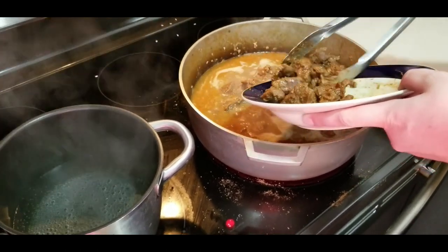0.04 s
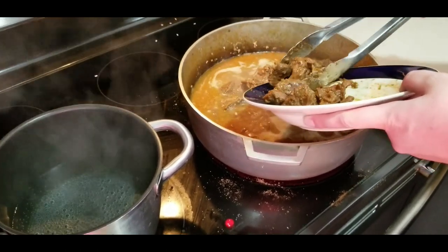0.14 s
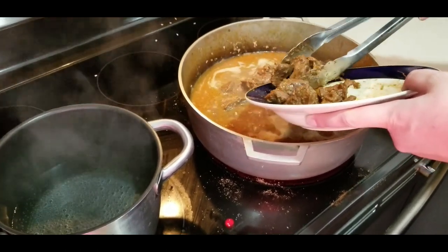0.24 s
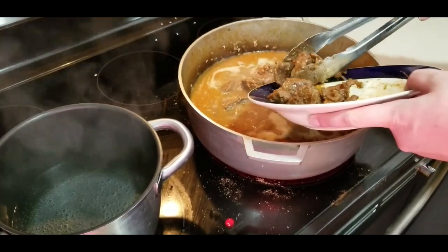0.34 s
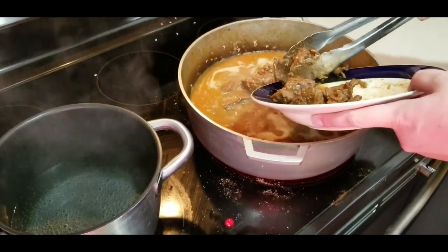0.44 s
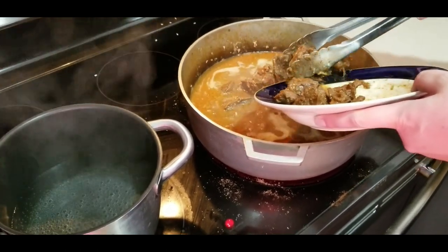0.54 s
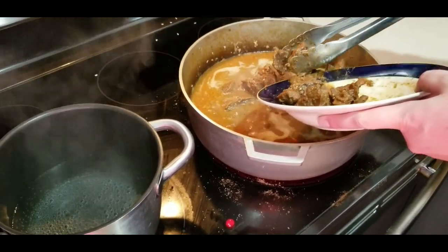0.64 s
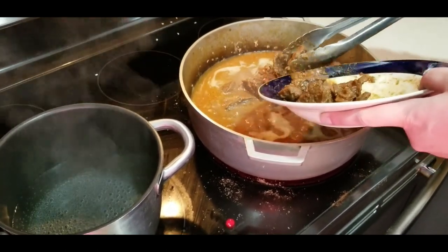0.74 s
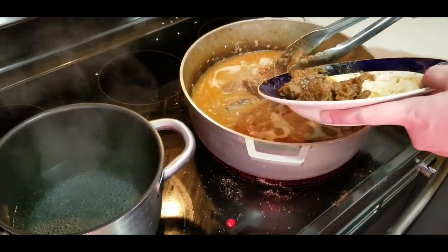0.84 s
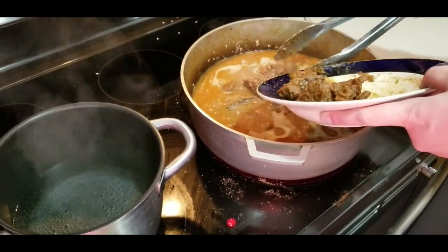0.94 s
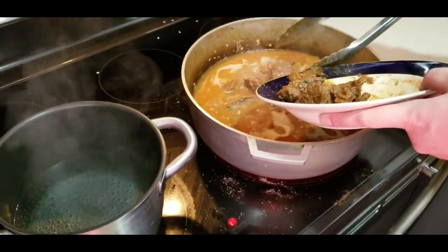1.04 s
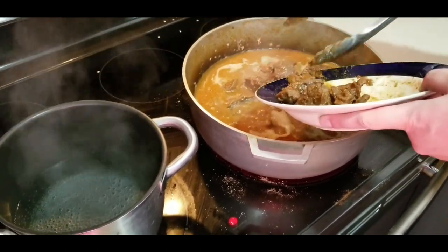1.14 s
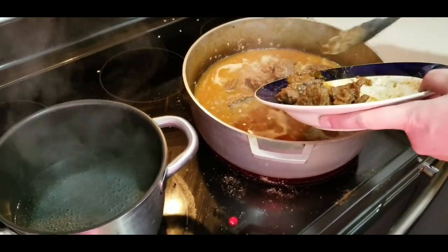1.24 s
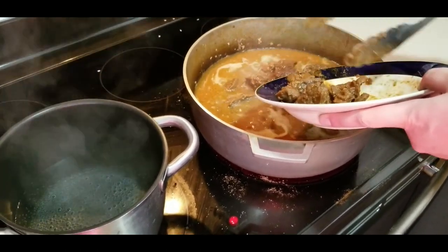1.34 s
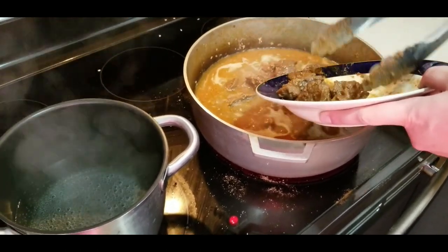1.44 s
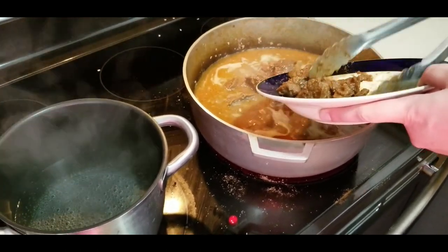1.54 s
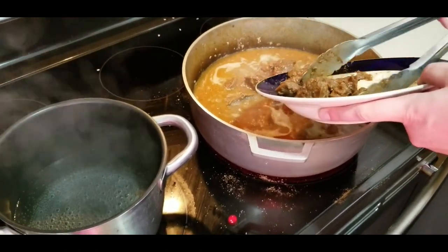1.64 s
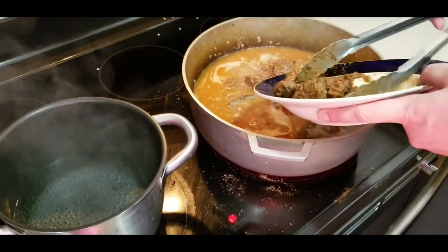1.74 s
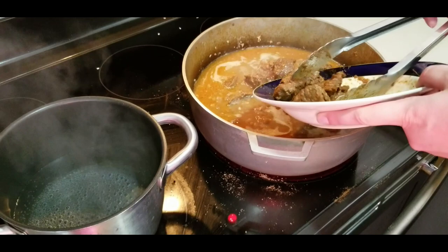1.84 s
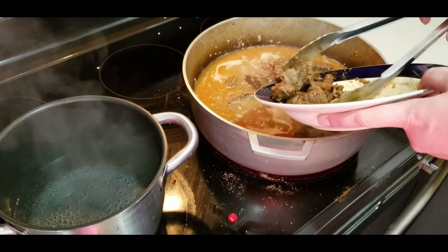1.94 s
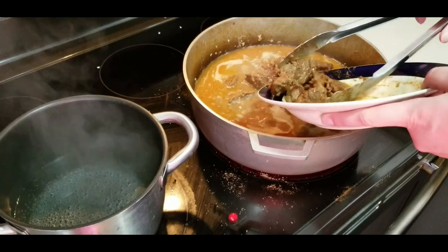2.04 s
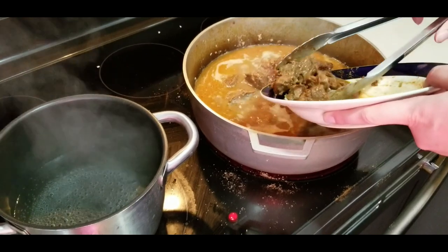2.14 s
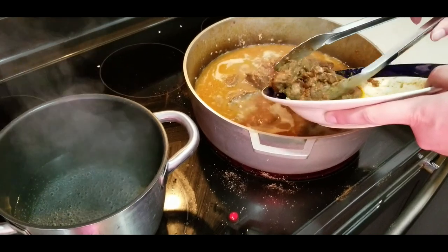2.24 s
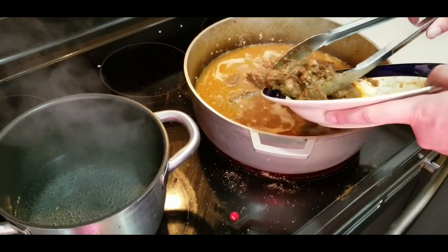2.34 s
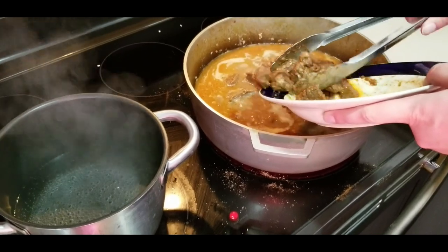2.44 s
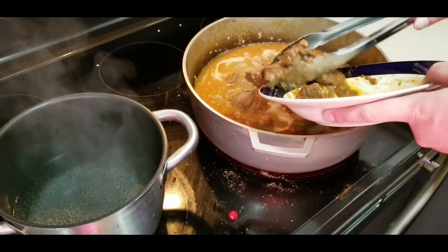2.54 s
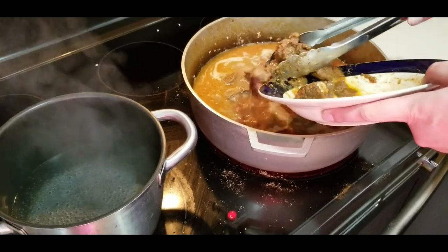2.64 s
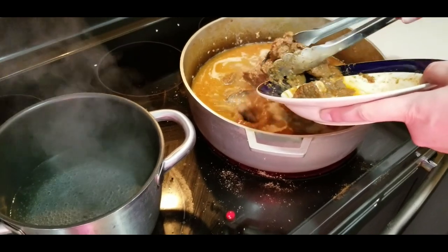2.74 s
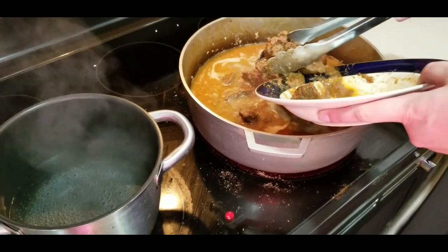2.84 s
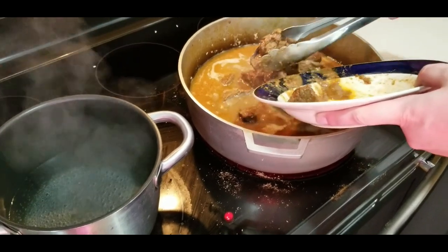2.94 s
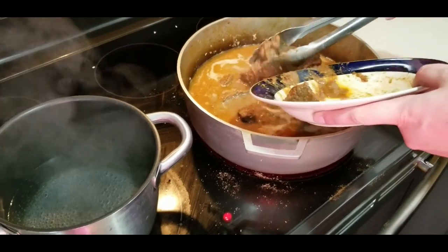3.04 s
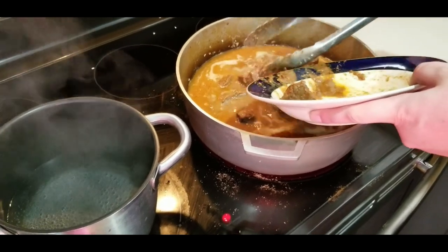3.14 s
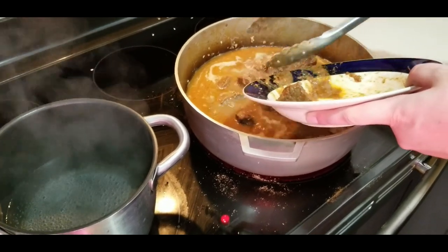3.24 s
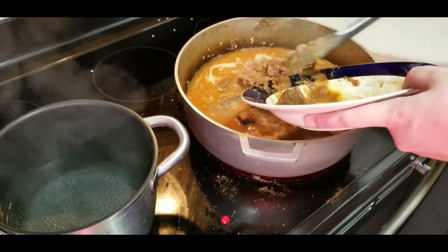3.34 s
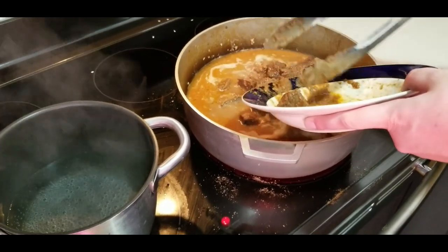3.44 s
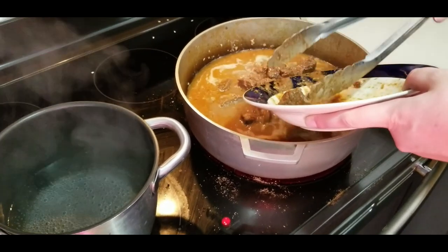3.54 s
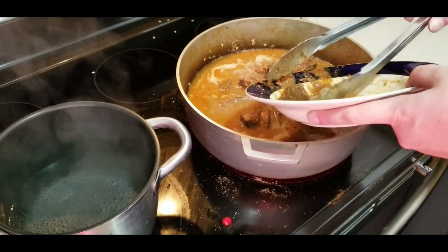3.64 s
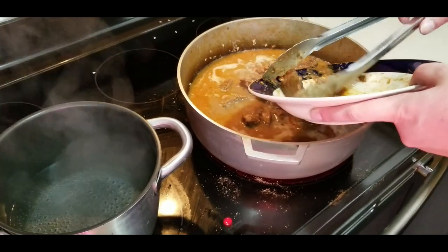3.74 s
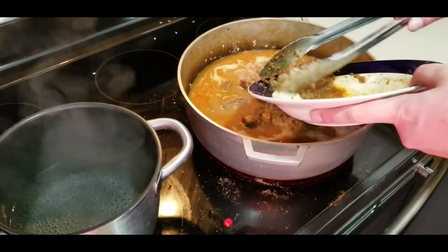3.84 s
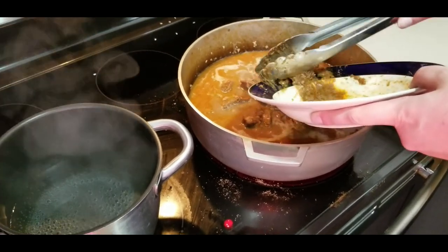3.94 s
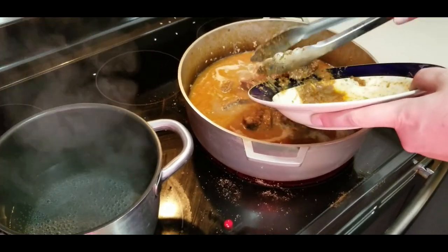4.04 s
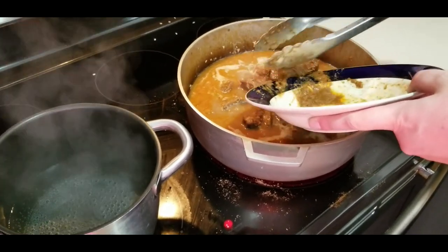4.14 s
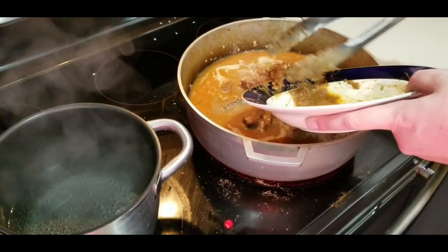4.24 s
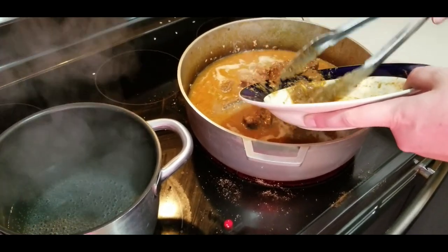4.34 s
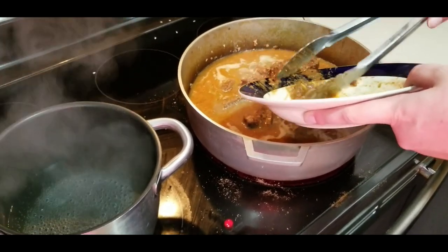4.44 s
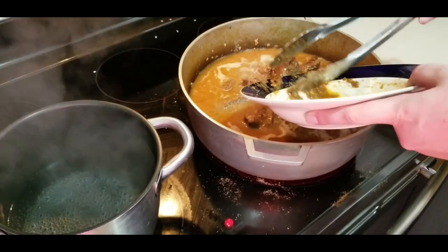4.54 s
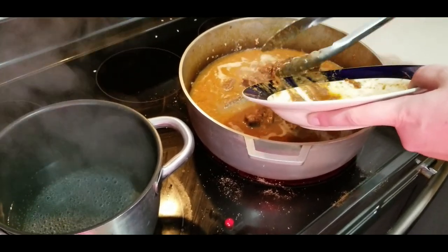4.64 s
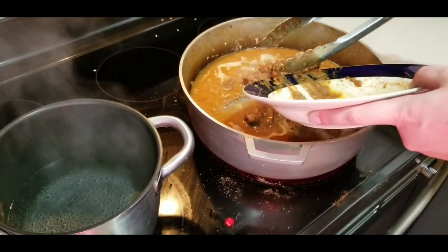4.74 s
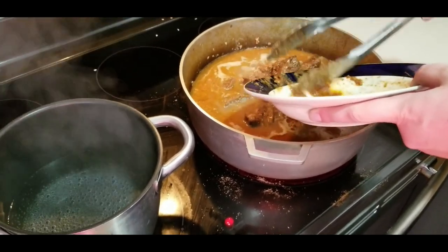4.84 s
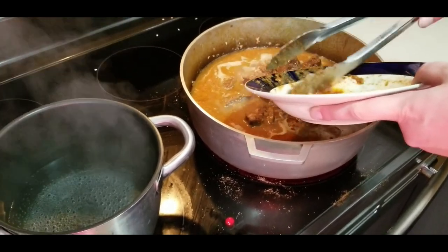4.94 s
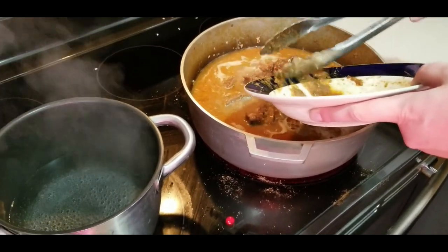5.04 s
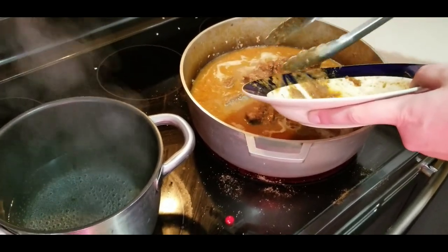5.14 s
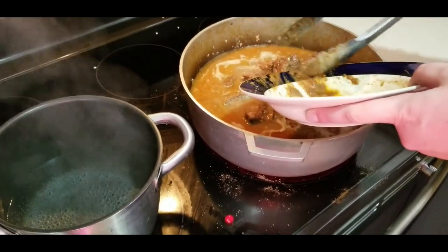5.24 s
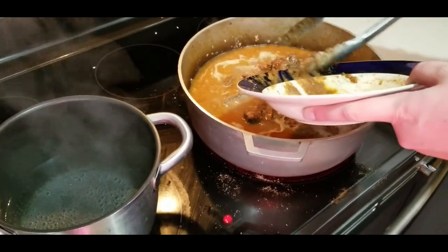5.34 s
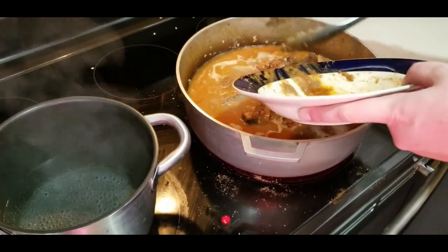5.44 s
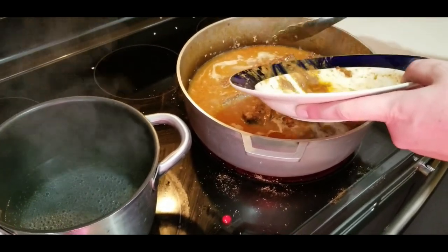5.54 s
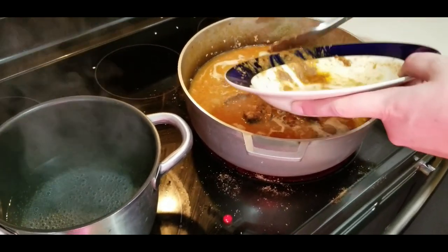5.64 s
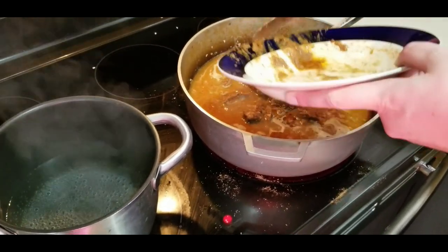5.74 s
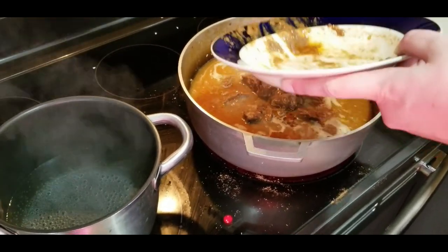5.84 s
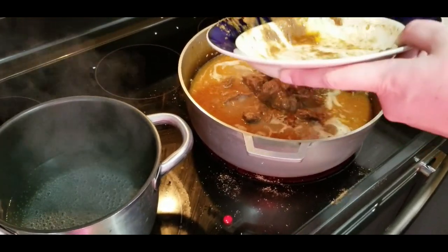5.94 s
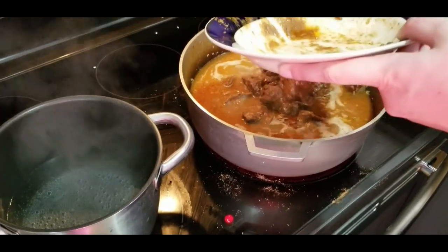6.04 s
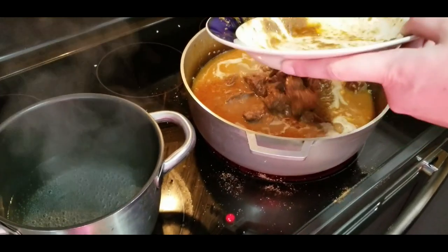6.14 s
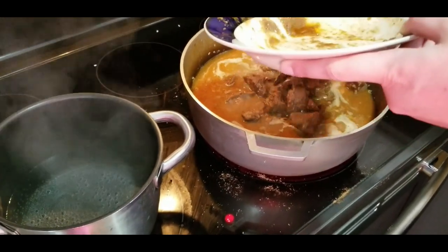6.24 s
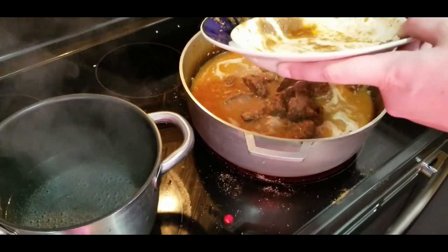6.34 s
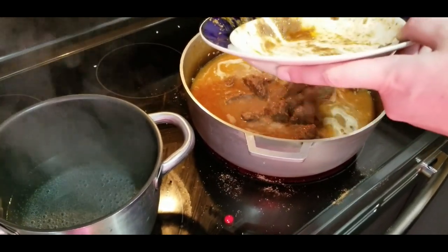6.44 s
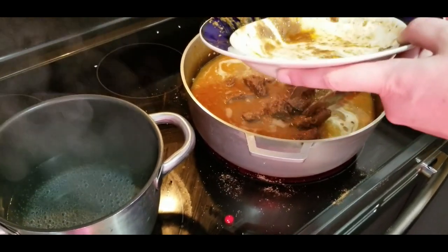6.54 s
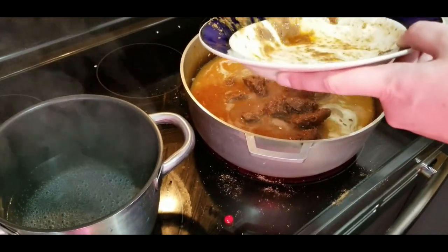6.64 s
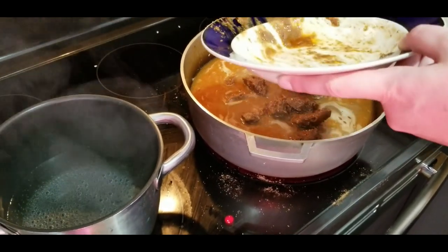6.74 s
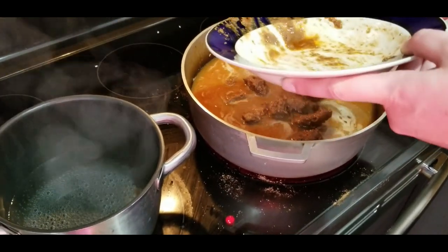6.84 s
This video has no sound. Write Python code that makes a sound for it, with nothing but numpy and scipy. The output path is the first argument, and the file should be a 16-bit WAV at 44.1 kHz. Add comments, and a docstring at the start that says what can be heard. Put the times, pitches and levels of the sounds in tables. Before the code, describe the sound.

A phone about half a metre from the stove picks up quiet simmering, plopping bubbles, airy steam and a wavering low drone. After a moment and a half, tongs knock sharply on a hand-held plate, ringing glassy and choked, with steel rattle and short gritty drags. The busiest strikes come in the second half, then stop; the kitchen bed drops and partly swells back, with a few faint spits and ticks.

```python
"""A kitchen heard from half a metre by a phone: from the first moment pots bubble and steam hisses over
stove rumble, mains hum and a wavering drone; steel tongs tick on their own, bubbles burst and sauce spits.
From 1.5 s the tongs strike and scrape a hand-held ceramic plate: each blow rings its modes and rattles the steel.
Late on the kitchen sinks in level, then partly returns. Damped tones make bubbles and plate, shaped noise the rest."""
import sys
import numpy as np
from scipy import signal
from scipy.fft import rfft, irfft
from scipy.io import wavfile
from scipy.ndimage import uniform_filter1d

SR = 44100
rng = np.random.default_rng(int(sys.argv[2]) if len(sys.argv) > 2 else 0)


def bounce(signal):
    """Save signal as a 16-bit WAV file at the path given by the first command-line argument."""
    frames = np.transpose(np.atleast_2d(signal))
    limited = np.clip(frames, -1, 1)
    pcm = np.round(limited * 32767).astype(np.int16)
    wavfile.write(sys.argv[1], SR, pcm)


N = 304025


def undb(db):
    """Decibels to amplitude."""
    return 10 ** (np.asarray(db) / 20)


def unit(x):
    """Scale to rms 1."""
    return x / np.sqrt(np.mean(x ** 2) + 1e-30)


def band(x, lo, hi):
    """Steep band-pass."""
    return signal.sosfilt(signal.butter(3, [lo, min(hi, SR / 2.2)], "band", fs=SR, output="sos"), x)


def fade(t, t60):
    """Exponential decay that falls 60 dB in t60."""
    return np.exp(-np.log(1000) * t / t60)


def curve(table):
    """Columns of a timed table at every sample."""
    s, *columns = np.transpose(table)
    return [np.interp(np.arange(N) / SR, s, c) for c in columns]


def pair(count, alike):
    """Left and right noise that share a part."""
    mid, side = rng.standard_normal((2, count))
    alike = np.clip(alike, 0, 1)
    opposite = np.array([[1], [-1]])
    return np.sqrt((1 + alike) / 2) * mid + np.sqrt((1 - alike) / 2) * side * opposite


def coloured(x, points):
    """Noise shaped by (f/Hz, level/dB) points, joined along log frequency."""
    hz, db = np.transpose(points)
    bins = np.maximum(np.arange(N // 2 + 1) * SR / N, 1)
    return irfft(rfft(x) * undb(np.interp(np.log(bins), np.log(hz), db)), N)


def walk(rate):
    """Slow chance, spread 1, smoothed twice over 1/rate seconds."""
    k = int(SR / rate)
    smooth = uniform_filter1d(rng.standard_normal(N), k)
    return unit(uniform_filter1d(smooth, k))


def add(out, s, sound, pan_db=0):
    """Mix a sound in at time s, left minus right by pan_db."""
    i = int(s * SR)
    gains = undb(np.array([[pan_db], [-pan_db]]) / 2)
    out[:, i:i + sound.shape[-1]] += (sound * gains)[:, :N - i]


def bubble(hz, cycles, glide):
    """A burst cavity: a damped tone that rises as it closes."""
    n = np.arange(int(3 * cycles * SR / hz)) * hz / SR  # time in cycles
    tone = np.sin(2 * np.pi * n * (1 + glide * n / cycles))
    return tone * np.exp(-2 * n / cycles) * np.minimum(n, 1)


def simmer(count=900, centre_hz=620, spread=0.1737, cycles=9, glide=0.044, size_db=0.0, pan_db=3):
    """A crowd of small bubbles in the pots, at chance times, pitches and sides."""
    out = np.zeros((2, N))
    for when, pitch, size, side in zip(rng.random(count), *rng.standard_normal((3, count))):
        sound = undb(size_db * size) * bubble(centre_hz * np.exp(spread * pitch), cycles, glide)
        add(out, when * (N - 1) / SR, sound, pan_db * side)
    return unit(out)


# colour of the hiss: f/Hz, level/dB per Hz
HISS_COLOUR = [(590, -34.5), (1000, 0), (1200, -9.5), (1470, -9.5), (2280, -19), (3120, -15.5), (6550, -15),
               (7530, -17.5), (8260, -23.5), (15100, -23.5), (16000, -37)]
# steam rises mostly to the right of the phone: f/Hz, left minus right/dB
HISS_PAN = [(1000, -3.5), (2400, -1), (4400, -11), (8100, -4.5), (15000, 2.5)]


def steam():
    """Smooth, slowly wavering hiss of steam, nearly unrelated in the two channels."""
    left, right = coloured(pair(N, 0.057), HISS_COLOUR)
    left = coloured(left, np.multiply(HISS_PAN, [1, .5]))
    right = coloured(right, np.multiply(HISS_PAN, [1, -.5]))
    return unit(np.array([left, right])) * undb(.6 * walk(5))


def spit(hz, cycles, grit):
    """A wet click: a bubble roughened by a breath of noise around its pitch."""
    tone = bubble(hz, cycles, glide=0.03)
    n = np.arange(len(tone))
    noise = unit(band(rng.standard_normal(len(tone)), hz / 1.57, hz * 1.26))
    onset = np.minimum(n * hz / SR / 2, 1)  # two cycles
    return tone + grit * noise * fade(n / len(tone), 2.2) * onset


def spatter(count=160, centre_hz=1100, spread=0.167, size_db=-0.5, pan_db=3):
    """A scatter of faint spits of sauce, at chance times, sizes, pitches and sides."""
    out = np.zeros((2, N))
    sizes = rng.exponential(size=count)
    for when, size, pitch, side in zip(rng.random(count), sizes, *rng.standard_normal((2, count))):
        sound = undb(size_db * size) * spit(centre_hz * np.exp(spread * pitch), cycles=5.3, grit=0.4)
        add(out, when * (N - 1) / SR, sound, pan_db * side)
    return unit(out)


# common level of all kitchen layers: t/s, level/dB
KITCHEN_LEVEL = [(0, -45), (.6, -44), (1.3, -44.5), (3.5, -44), (4.25, -45.5), (4.7, -47.5), (5.2, -46),
                 (5.5, -52), (6.0, -52), (6.89, -47)]
# colour of stove and pots: f/Hz, level/dB per Hz
RUMBLE_COLOUR = [(36, -45), (62, -10.5), (112, -8.5), (146, -3.5), (178, -7.5), (237, -4), (271, -13),
                 (356, -2.5), (388, -21.5), (492, -7.5), (599, -4.5), (713, -16.5), (778, -8), (1110, -32),
                 (1200, -28), (1560, -44), (2640, -120)]
# side the rumble comes from: f/Hz, left minus right/dB
RUMBLE_PAN = [(40, -0.5), (80, -1.5), (160, 0.7), (240, -2), (400, -9.5)]
MAINS_HZ, MAINS_DB = 47.7, -7.5
DRONE_HZ, DRONE_WIDTH_HZ, DRONE_DB = 149.4, 9.7, -3
RUMBLE_DB, STEAM_DB, SPATTER_DB = -3.5, -7.5, -18  # against the kitchen level


def kitchen(bubble_db=-3, swell_db=2.0):
    """Rumble of stove and pots, mains hum, a wavering narrow-band drone, bubbles, spits and steam."""
    kitchen_db, = curve(KITCHEN_LEVEL)
    low = coloured(pair(N, 0.92), RUMBLE_COLOUR)
    low = signal.sosfilt(signal.butter(4, 430, fs=SR, output="sos"), low)
    low = np.array([coloured(ear, np.multiply(RUMBLE_PAN, [1, half])) for ear, half in zip(low, (.5, -.5))])
    mains = np.sin(2 * np.pi * MAINS_HZ * np.arange(N) / SR)
    mains = undb(MAINS_DB + np.array([[-.7], [.7]])) * mains
    drone = band(rng.standard_normal(N), DRONE_HZ - DRONE_WIDTH_HZ / 2, DRONE_HZ + DRONE_WIDTH_HZ / 2)
    rumble = undb(0.5) * unit(low) + mains + undb(DRONE_DB) * unit(drone)
    seethe = unit(band(coloured(pair(N, 0.45), RUMBLE_COLOUR), 405, 1230))
    boil = undb(-2.5) * seethe * undb(swell_db * walk(2.25)) + undb(bubble_db) * simmer()
    air = undb(STEAM_DB) * steam() + undb(SPATTER_DB) * spatter()
    return undb(kitchen_db) * (undb(RUMBLE_DB) * rumble + boil + air)


# the tongs' own ticks and clacks: t/s, level/dB, brightness/dB from band to band, t60/s
TICKS = [(0.0116, -61.5, 2, 0.24), (0.208, -60.5, -5, 0.071), (0.2483, -64, -3, 0.23),
         (0.2777, -61.5, 1, 0.15), (0.324, -66.5, -10, 0.15), (0.587, -71, 11, 0.19),
         (0.6678, -56.5, 10.5, 0.17), (0.7217, -60, 2, 0.18), (0.7813, -66, 7, 0.14),
         (0.8074, -68, 9, 0.33), (0.906, -53.5, 5.5, 0.18), (2.5572, -34, 6, 0.042),
         (2.6867, -40, -0.5, 0.12), (2.9224, -54, 5, 0.29), (2.996, -50.5, 3.5, 0.17),
         (3.0313, -49.5, -1, 0.062), (3.0632, -55, 3, 0.42), (3.229, -52.5, -4, 0.41),
         (4.035, -61, -5, 0.12), (4.7006, -58.5, -0.5, 0.17), (6.0194, -67.5, 1, 0.12),
         (6.217, -66.5, -1, 0.12), (6.45, -69.5, 14, 0.23)]
# bands of a tick: low f/Hz, high f/Hz
TICK_BANDS = [(2500, 5000), (5000, 8000), (8000, 16000)]
# balance of those bands: level/dB
TICK_BANDS_DB = [0, 1, -1.5]
TICK_PAN_DB = -3.5


def ticks(out, alike=0.19, crack_db=5, crack_t60=0.032):
    """Thin steel clicks: a sharp crack and a short unpitched rattle."""
    t = np.arange(int(.3 * SR)) / SR
    for s, level_db, bright_db, t60 in TICKS:
        band_db = np.add(TICK_BANDS_DB, bright_db * np.array([-1, 0, 1]))
        rattle = 0
        for edges, db in zip(TICK_BANDS, band_db):
            rattle = rattle + undb(db) * unit(band(pair(len(t), alike), *edges))
        decay = fade(t, t60) + undb(crack_db) * fade(t, crack_t60)
        add(out, s, undb(level_db) * rattle * decay, TICK_PAN_DB)


# big bubbles bursting in the pots: t/s, level/dB, f/Hz
POPS = [(0.022, -34, 640), (0.083, -30.5, 495), (0.222, -31, 530), (0.346, -31, 506), (0.577, -28, 600),
        (0.861, -30.5, 588), (1.054, -29.5, 493), (1.123, -29, 616), (2.02, -29.5, 610), (2.083, -31, 530),
        (2.164, -30.5, 614), (3.429, -36, 650), (4.088, -32, 584), (4.266, -30, 623), (4.317, -31.5, 555),
        (5.093, -36, 610), (5.216, -33, 750), (6.103, -36, 944), (6.219, -35, 533), (6.423, -38, 596)]


def pops(out, pan_db=-3.0):
    """Single bubbles that stand out: damped tones with a slight rise."""
    for s, level_db, hz in POPS:
        add(out, s, undb(level_db) * bubble(hz, cycles=8.8, glide=0.023), pan_db)


# sauce spitting, short and higher: t/s, level/dB, f/Hz
SPITS = [(0.2485, -42, 1740), (0.387, -35.5, 1130), (0.599, -39, 1120), (0.8091, -37, 1610),
         (0.9564, -38, 1570), (1.071, -40.5, 1360), (1.266, -33, 1100), (1.3565, -36.5, 1150),
         (1.8485, -38.5, 1460), (2.986, -30.5, 1560), (3.2302, -31, 1110), (3.5513, -28.5, 1410),
         (4.2905, -33.5, 1460), (5.8396, -42, 1294), (5.9868, -38.5, 1010), (6.2165, -42, 1130),
         (6.3724, -41, 1510), (6.4424, -36.5, 1124), (6.523, -39.5, 1110)]


def spits(out, pan_db=-3.0):
    """Single spits of sauce that stand out: gritty damped tones."""
    for s, level_db, hz in SPITS:
        add(out, s, undb(level_db) * spit(hz, cycles=5.7, grit=0.5), pan_db)


def splinter(x, spiky_db, width_hz):
    """Break a noise into many narrow partials, as thin steel rings."""
    count = x.shape[-1]
    width = max(int(width_hz * count / SR), 1)
    ripple = unit(uniform_filter1d(rng.standard_normal(count // 2 + 1), width))
    return irfft(rfft(x) * undb(spiky_db * ripple), count)


# modes of the plate, in families that a blow excites together:
# f/Hz, level/dB, t60/s, left minus right/dB, left lead/rad
PLATE_FAMILIES = [
    [(934.5, 0.5, 0.04, -5, 0), (760, -6, 0.15, -2, 0), (1318, -12, .1, 4, -.5)],
    [(1876, -4.5, 0.35, 6, 1.5), (1831, -5.5, 0.144, -2, -1), (2068, -6.5, 0.12, -1, -4.5),
     (2366, -12, 0.15, 9.5, 3.5)],
    [(3090, 2, 0.27, 6, 2.25), (3134, -8, 0.059, -24, 0.9), (3300, -17.5, .12, 6, 0.93)],
    [(3566, 6.5, .25, 1, 1.94), (3466, -5.5, 0.075, -13.5, .5), (3920, -8.5, 0.13, -8, 0.75)],
    [(4280, 3.5, 0.034, -4.5, 7.95), (4390, -14.5, 0.283, -6, 4.3), (4270, -15, 0.39, -9.5, 3.1),
     (4900, -24.5, 0.067, -12.5, 2.5)],
    [(5800, 2, 0.073, -5.5, 1.83), (5670, -17, 0.065, -29.5, 2.5), (6090, -12.5, 0.017, -22.5, 0.295)],
    [(6620, 0, 0.16, -11.5, 1.83), (6940, -7.5, 0.22, -13, 4.7)],
    [(7240, 2, 0.19, -11, 4.5), (7430, 0.5, 0.095, 8, -0.3), (9500, -1.5, 0.14, 4.5, -14),
     (12400, 0, 0.128, -3, 6), (14730, -19, .12, -5.5, -5)],
]
# bands of the steel's rattle: low f/Hz, high f/Hz
RATTLE_BANDS = [(700, 2600), (2600, 5000), (5000, 8000), (8000, 11000), (11000, 16000)]
# decay of each rattle band: t60/s
RATTLE_T60 = [0.088, 0.087, 0.044, 0.097, 0.062]
# side of each rattle band: left minus right/dB
RATTLE_PAN_DB = [-3, -2, 0, 3, -4.5]


def ring(ring_db, rattle_db, grip_hz, chatter_s, free, waver=0.67, waver_s=0.0094, scatter_db=1,
         alike=0.17, spiky_db=5, width_hz=50, first_db=6, first_t60=0.056):
    """Answer to a blow: plate modes swell and steel rattles while the edge chatters, then both die."""
    t = np.arange(int(.36 * SR)) / SR
    after = np.maximum(t - chatter_s, 0)
    swell = np.minimum((t + 0.0042) / (chatter_s + 0.0022), 1) ** 0.28
    # the holding hand takes the first energy
    swell = swell * (1 + undb(first_db) * fade(after, first_t60)) / (1 + undb(first_db))
    ears = np.array([[.5], [-.5]])
    knots = waver_s * np.arange(40)
    out = 0
    for family, db, lead_hz in zip(PLATE_FAMILIES, ring_db, grip_hz):
        for k, (hz, mode_db, t60, pan_db, lead) in enumerate(family):
            if k == 0 and lead_hz:  # the grip sets the first mode; 0 leaves its own pitch
                hz = lead_hz
            # the plate rocks in the hand and touches food and steel, so each mode drifts in phase
            drift = waver * np.interp(t, knots, np.cumsum(rng.standard_normal(len(knots))))
            tone = np.sqrt(2) * np.sin(2 * np.pi * hz * t + drift + lead * ears) * undb(pan_db * ears)
            level = undb(db + mode_db + scatter_db * rng.standard_normal())
            out = out + level * swell * fade(after, free * t60) * tone
    steel = splinter(pair(len(t), alike), spiky_db, width_hz)
    onset = np.minimum(t / 0.0022, 1)
    for edges, db, t60, pan_db in zip(RATTLE_BANDS, rattle_db, RATTLE_T60, RATTLE_PAN_DB):
        out = out + undb(db + pan_db * ears) * unit(band(steel, *edges)) * fade(after, t60) * onset
    return out


# blows on the plate: t/s, level/dB, place (0 well - 1 rim), hardness/dB, fourth and sixth family level/dB,
# third, fourth and sixth family f/Hz (these shift with the grip), freedom to ring (share of the t60)
BLOWS = [(1.5399, -8, 0.18, 1.5, -32, -10.5, 2900, 3570, 5590, 0.23),
         (1.7762, -35.5, 0.21, 8, -12, -17, 3110, 3455, 5540, 0.29),
         (1.8143, -39.5, 0.17, 6, -9.5, -13, 3200, 3450, 5500, 0.43),
         (1.9064, -19.5, 0.12, -5.5, -18, -11.5, 3220, 3487, 5595, 0.7),
         (1.9504, -17, 0.2, -3, -12.5, -19.5, 3110, 3620, 5530, 0.18),
         (2.4713, -8.5, 0.98, -8, -19, -23, 3130, 3530, 5670, 0.69),
         (2.7054, -5.5, 0.65, -4, -25, -17.5, 3250, 3535, 5880, 0.16),
         (3.624, -11, 0.038, 4.5, -13.5, -7.5, 3170, 3576, 5544, 0.61),
         (3.707, -13.5, 0.33, 0, -42, -18, 2990, 3550, 5520, 0.85),
         (3.8166, -14.5, 0.81, -5, -22, -22, 3180, 3550, 5700, 0.87),
         (3.847, -18, 0.99, -1.5, -18, -15.5, 3250, 3640, 5770, 0.5),
         (4.3416, -7, 0.027, 6.5, -19.5, -6, 3200, 3565, 5585, 0.49),
         (4.6109, -23.5, 0.74, 2, -21, -13, 3084, 3584, 5630, 0.44),
         (4.8683, -3, 0.43, -2, -25, -11, 3130, 3545, 5454, 0.35),
         (4.937, -19.5, 1, -9.5, -26, -34, 3130, 3500, 5800, 0.98),
         (4.9885, -7.5, 1, 0, -19, -13.5, 3174, 3550, 5720, 0.39),
         (5.2642, -6, 0.84, 7, -17.5, -25.5, 3146, 3555, 5770, 1)]
# plate families for a blow in the well, and on the rim: level/dB (fourth and sixth come from each blow)
WELL_RING_DB = [-25.5, -38.5, -49.5, 0, -29, 0, -21.5, -29]
RIM_RING_DB = [-26, -13.5, -12.5, 0, -16.5, 0, -18.5, -24.5]
# rattle bands for a blow in the well, and on the rim: level/dB
WELL_RATTLE_DB = [-28, -22, -15, -21.5, -13.5]
RIM_RATTLE_DB = [-18.5, -13.5, -19, -23, -24.5]
# share of a blow's hardness that each family, and each rattle band, takes
RING_HARDNESS = [0.1, 0.22, 0.23, 0, 0.05, 0, 0.6, 0.94]
RATTLE_HARDNESS = [0.17, 0.106, 0.31, 0.73, 1]
FIFTH_HZ, CHATTER_S, BLOW_PAN_DB = 4461, 0.0071, 0.2
CHOKE_DB, CHOKE_S, CLACK_DB = -8.5, 0.006, -45  # ticks above CLACK_DB choke a ring too


def blows(out):
    """The steel edge lands on the glaze; place and hardness set what rings, and the next touch chokes it."""
    clacks = [tick[0] for tick in TICKS if tick[1] > CLACK_DB]
    touches = np.array([blow[0] for blow in BLOWS] + clacks + [N])  # N: no touch after the last
    for s, level_db, place, hard_db, fourth_db, sixth_db, third_hz, fourth_hz, sixth_hz, free in BLOWS:
        ring_db = np.add(WELL_RING_DB, place * np.subtract(RIM_RING_DB, WELL_RING_DB))
        ring_db = ring_db + hard_db * np.array(RING_HARDNESS)
        ring_db[[3, 5]] = fourth_db, sixth_db
        rattle_db = np.add(WELL_RATTLE_DB, place * np.subtract(RIM_RATTLE_DB, WELL_RATTLE_DB))
        rattle_db = rattle_db + hard_db * np.array(RATTLE_HARDNESS)
        grip_hz = [0, 0, third_hz, fourth_hz, FIFTH_HZ, sixth_hz, 0, 0]
        sound = ring(ring_db, rattle_db, grip_hz, CHATTER_S, free)
        since_touch = s + np.arange(sound.shape[1]) / SR - touches[touches > s].min()
        choke_db = CHOKE_DB * np.clip(since_touch / CHOKE_S, 0, 1)
        add(out, s, undb(level_db + choke_db) * sound, BLOW_PAN_DB)


# strokes of steel dragged over glaze: t/s, level/dB at 1.3-4.3 kHz, brightness/dB
SCRAPES = [
    [(1.62, -51, 4), (1.692, -55.5, 3), (1.78, -50.5, 1), (1.812, -52, -4), (1.88, -78, -3)],
    [(4.4, -49, 6), (4.47, -51, -10), (4.515, -44, -9), (4.545, -33.5, -9), (4.575, -35.5, 1),
     (4.615, -41, 3), (4.65, -62.5, -4)],
]
# plate families under a scrape: level/dB
SCRAPE_RING_DB = [0, -2, -10.5, -7.5, -6, -4, -5, -12.5]
# rattle bands under a scrape: level/dB
SCRAPE_RATTLE_DB = [1.5, -6.5, -11, -8.5, -1]
# first mode of each family: f/Hz (0 keeps the plate's own; values near zero make that mode inaudible)
SCRAPE_GRIP_HZ = [-2.5, -0.5, 3150, -0.5, 4471, 5700, 0, 1.5]
SCRAPE_TOP_DB, SCRAPE_TOP_SHARE = -5.5, 1.7  # level above 8 kHz, and its share of the brightness


def scrapes(out, slip_db=3, slip_share=0.07, damped_t60=0.15, pan_db=-1):
    """Uneven slips of the edge keep plate and tongs ringing."""
    body = ring(SCRAPE_RING_DB, SCRAPE_RATTLE_DB, SCRAPE_GRIP_HZ, 0, 1)[:, :SR // 8]
    body = body * fade(np.arange(body.shape[1]) / SR, damped_t60)  # food and steel damp the plate
    for stroke in SCRAPES:
        a, b = int(stroke[0][0] * SR), int(stroke[-1][0] * SR)
        level_db, mid_db = (c[a:b] for c in curve(stroke))
        treble_db = SCRAPE_TOP_DB + SCRAPE_TOP_SHARE * mid_db
        slips = (rng.random(b - a) < slip_share) * rng.standard_normal(b - a)
        slips = slips * undb(slip_db * rng.standard_normal(b - a))
        drag = signal.fftconvolve(body, slips[None], axes=1)[:, :b - a]
        low = unit(band(drag, 1300, 4300))
        mid = undb(mid_db) * unit(band(drag, 4300, 8000))
        treble = undb(treble_db) * unit(band(drag, 8000, 16000))
        sound = undb(level_db) * (low + mid + treble) * signal.windows.tukey(b - a, .2)
        add(out, a / SR, sound, pan_db)


WALLS_DB, WALLS_T60, WALLS_DELAY_S = -6, 0.31, 0.003


def walls(x, treble_t60=0.23):
    """Tiles and cupboards send a short diffuse echo back, which makes every ring waver."""
    t = np.arange(int(.4 * SR)) / SR
    echo = band(pair(len(t), 0.13), 530, 5600) * fade(t, WALLS_T60)
    echo = echo + band(pair(len(t), 0), 5400, SR / 2) * fade(t, treble_t60)
    echo = echo * (t > WALLS_DELAY_S) / np.sqrt(np.sum(echo ** 2) / 2)
    return x + undb(WALLS_DB) * signal.oaconvolve(x, echo, axes=1)[:, :N]


def scene():
    """Pots and steam all along; tongs, bubbles, spits and plate near the phone, echoed by the walls."""
    near = np.zeros((2, N))
    for source in (blows, ticks, scrapes, pops, spits):
        source(near)
    return walls(near) + kitchen()


TOP_HZ = 15800


def record(dry):
    """The phone rounds the loudest peaks and cuts the top."""
    dry = .88 * np.tanh(dry / .88)
    return signal.sosfilt(signal.ellip(8, .2, 90, TOP_HZ, fs=SR, output="sos"), dry)


dry = scene()
out = record(dry)
bounce(out)
```